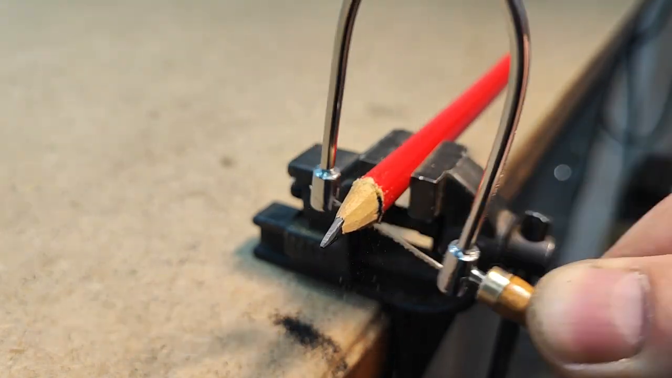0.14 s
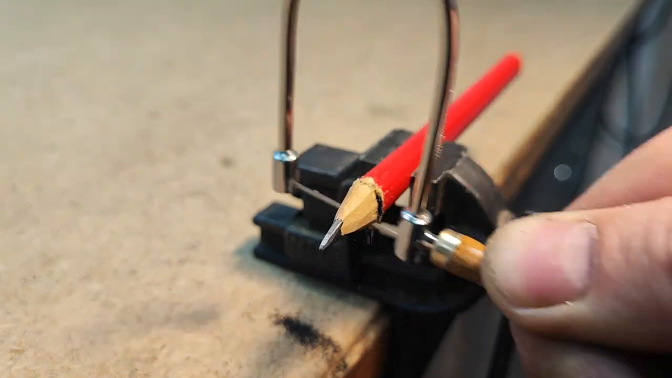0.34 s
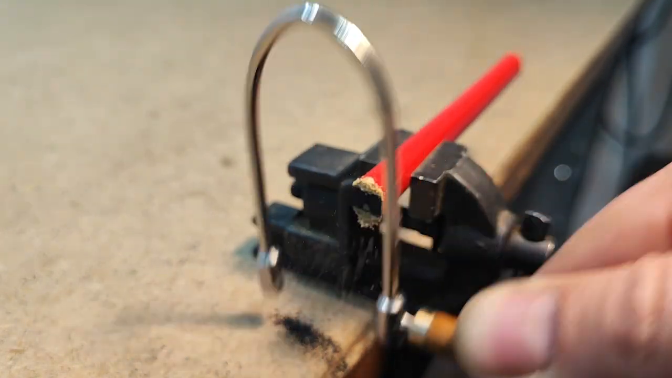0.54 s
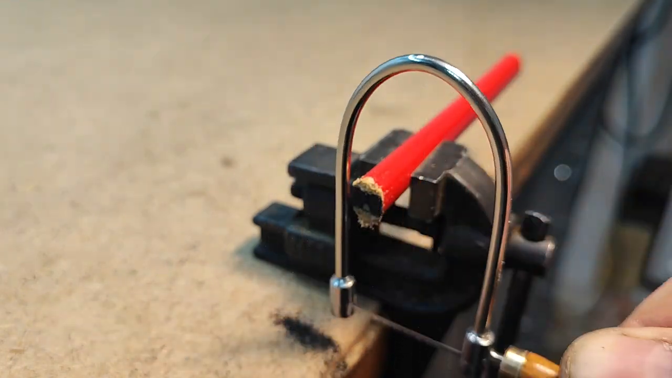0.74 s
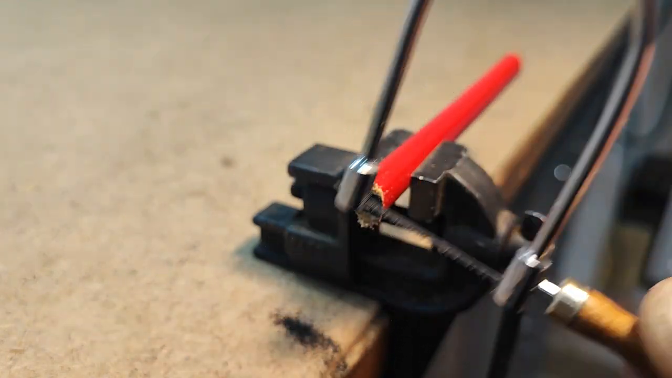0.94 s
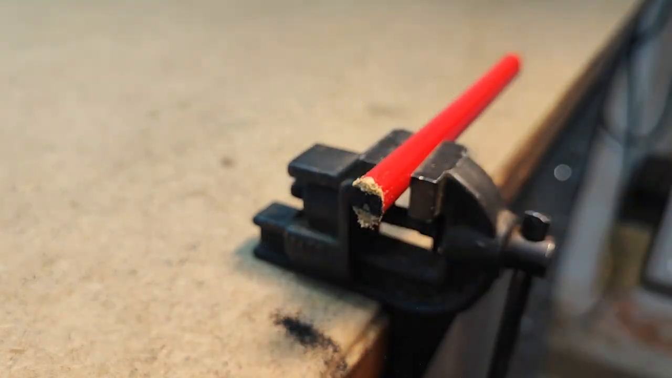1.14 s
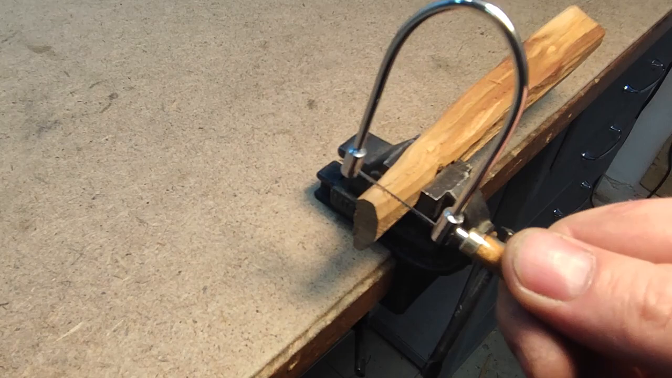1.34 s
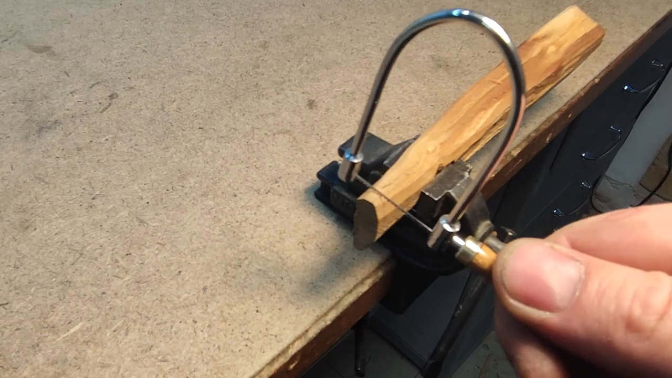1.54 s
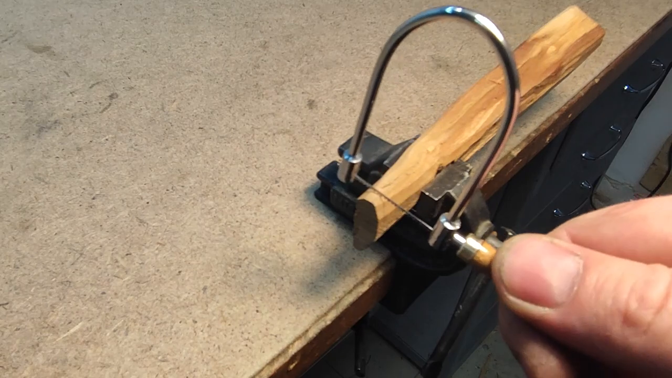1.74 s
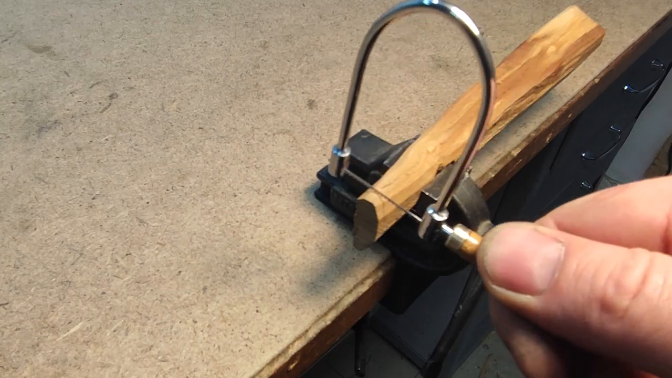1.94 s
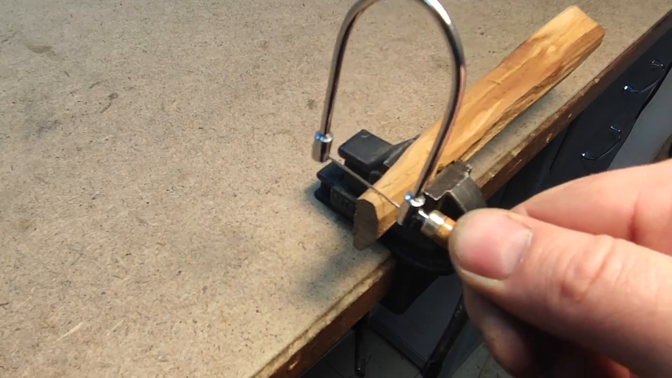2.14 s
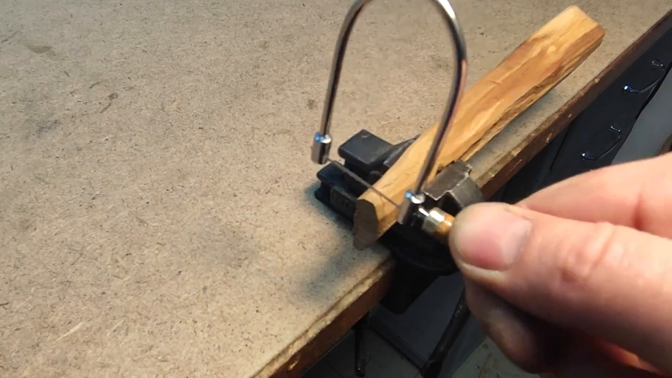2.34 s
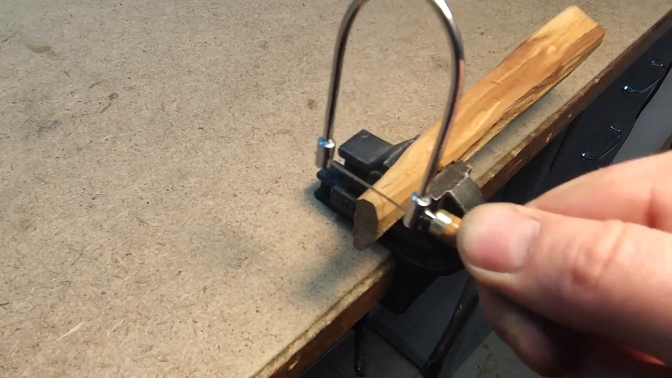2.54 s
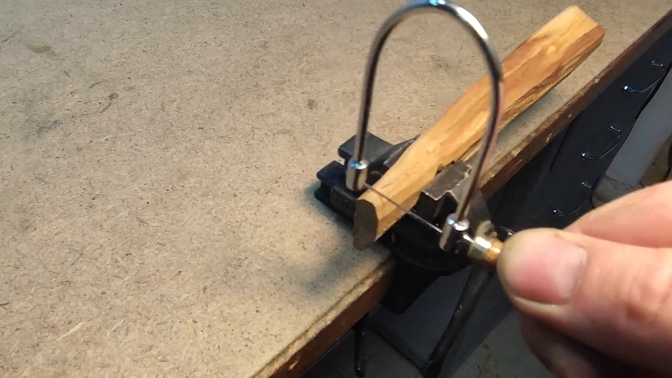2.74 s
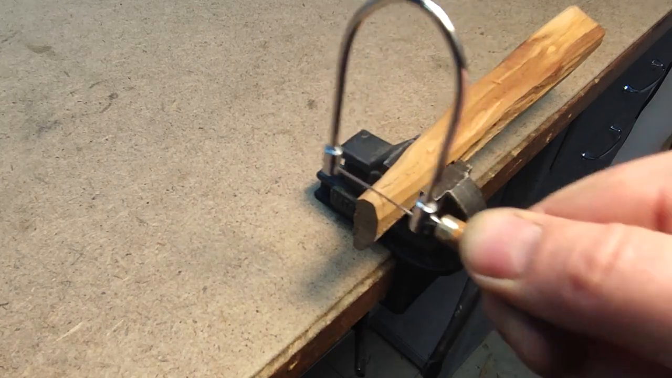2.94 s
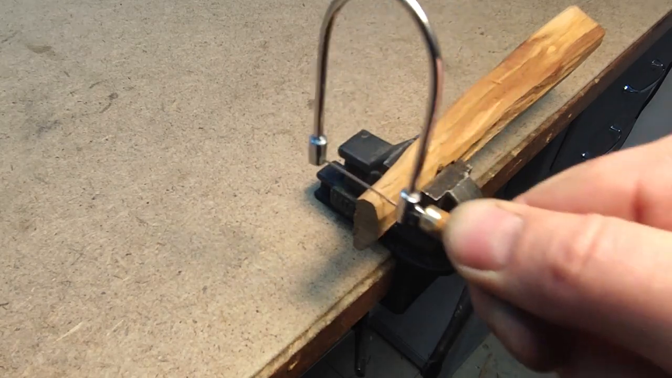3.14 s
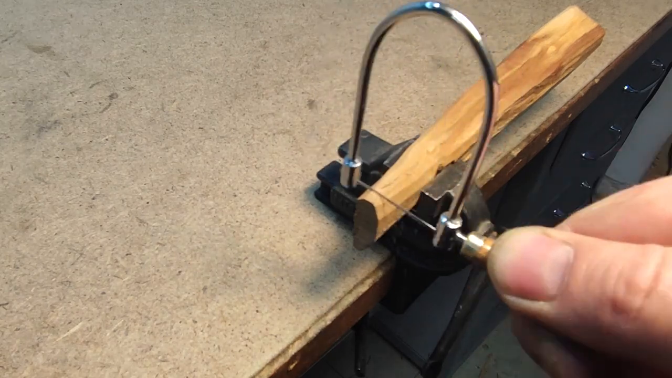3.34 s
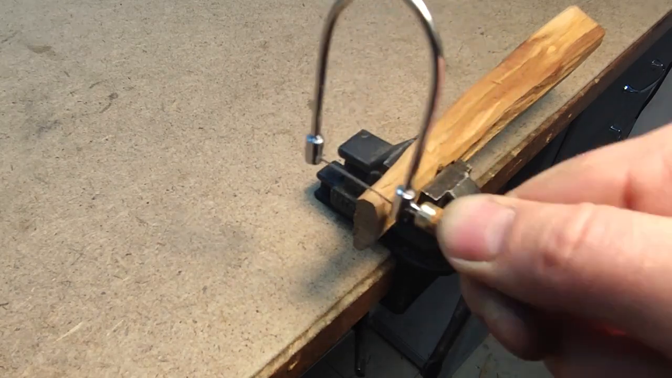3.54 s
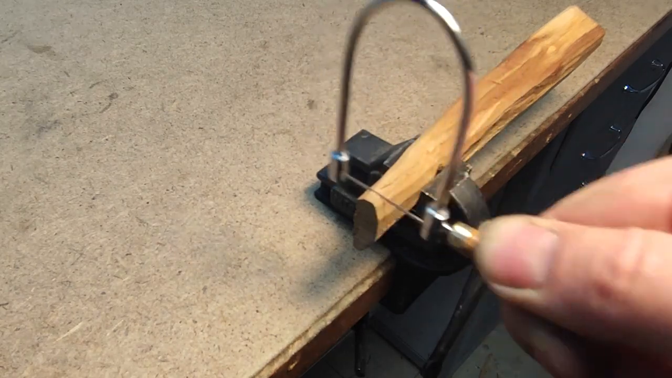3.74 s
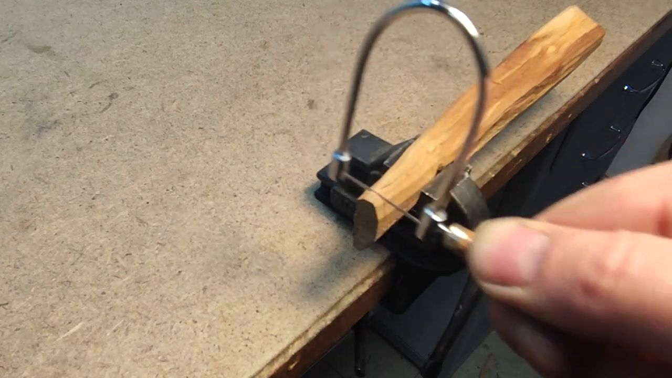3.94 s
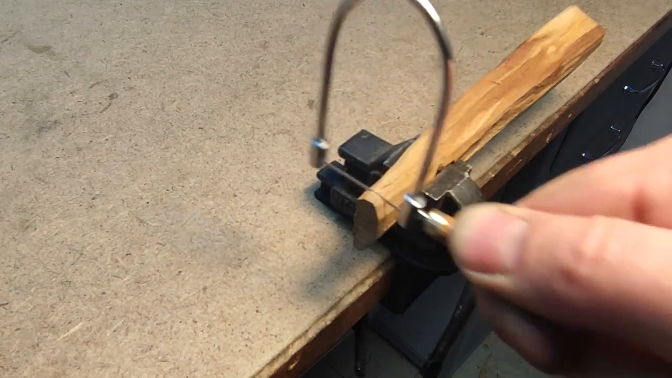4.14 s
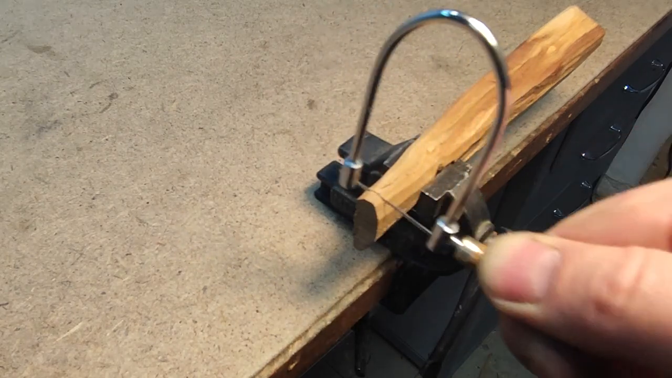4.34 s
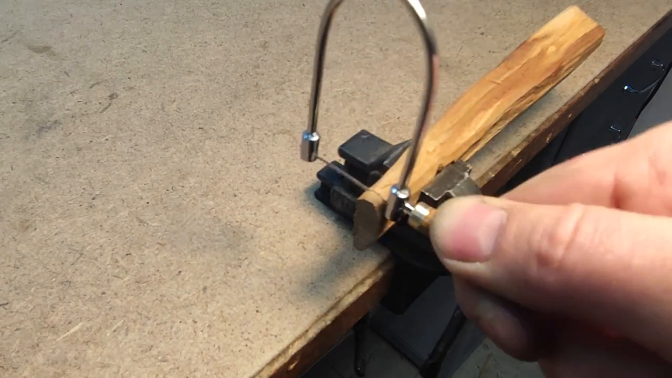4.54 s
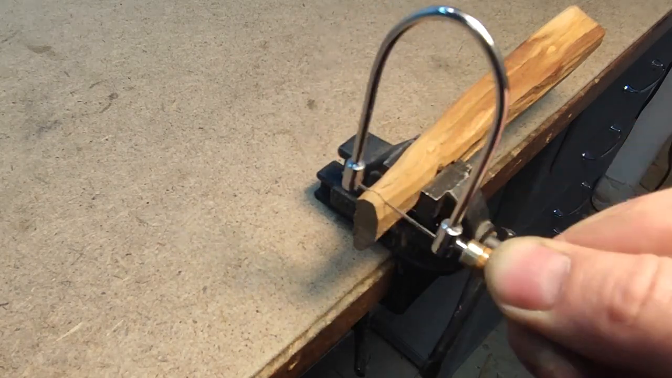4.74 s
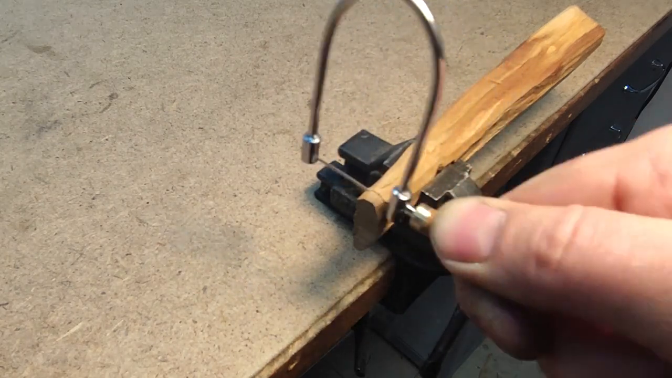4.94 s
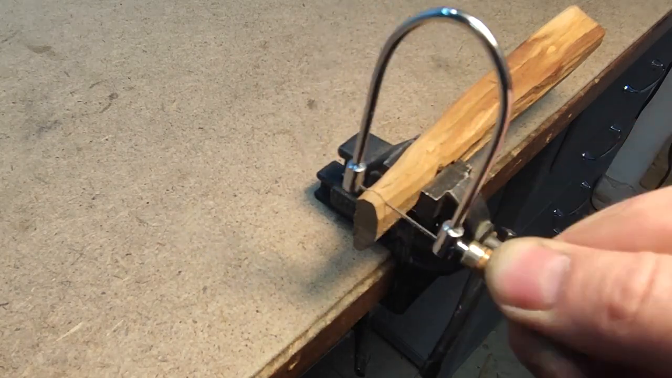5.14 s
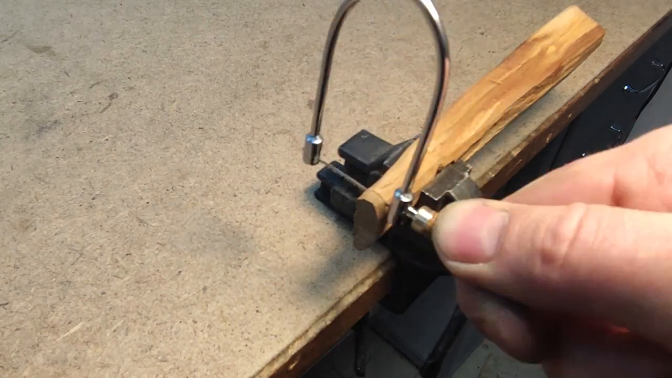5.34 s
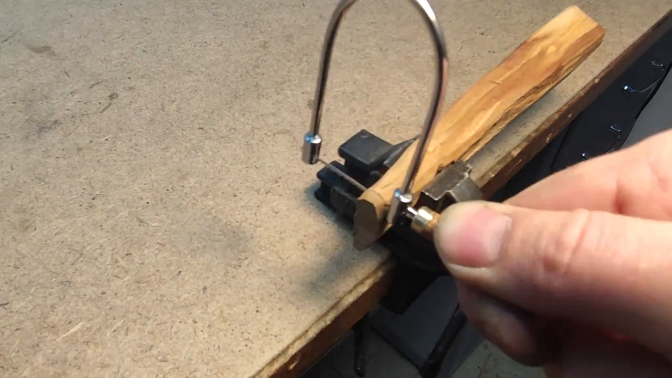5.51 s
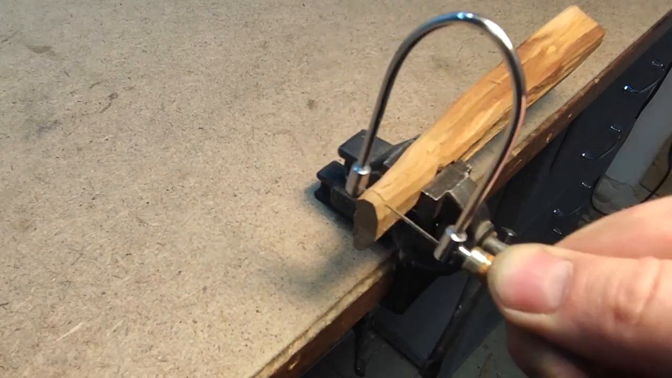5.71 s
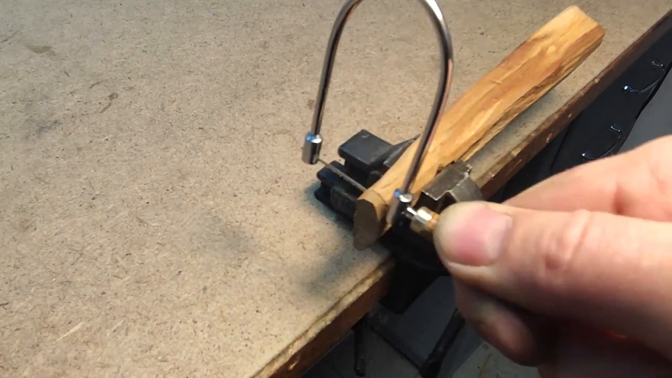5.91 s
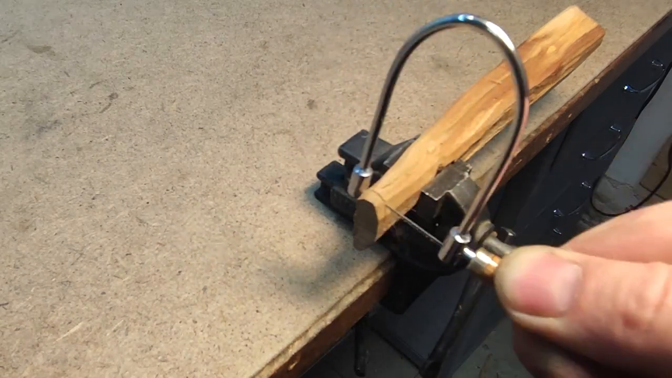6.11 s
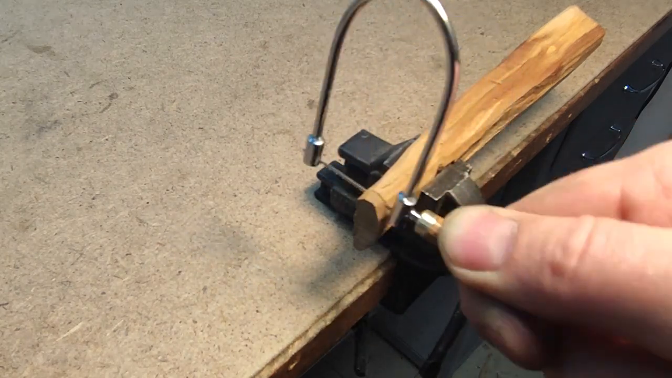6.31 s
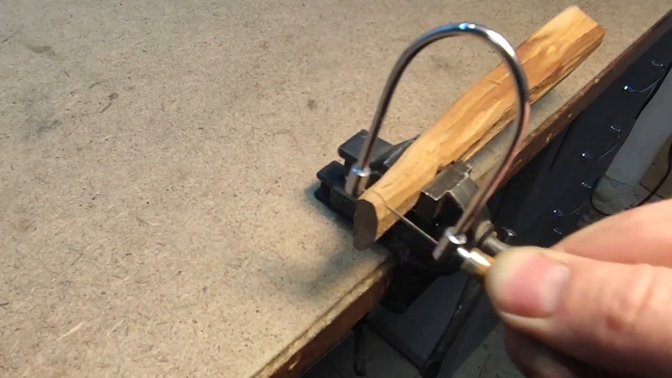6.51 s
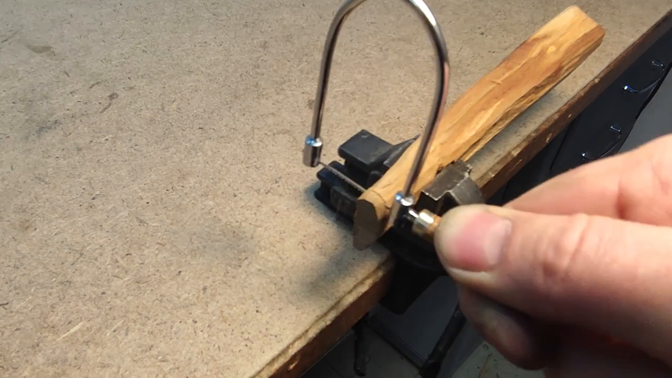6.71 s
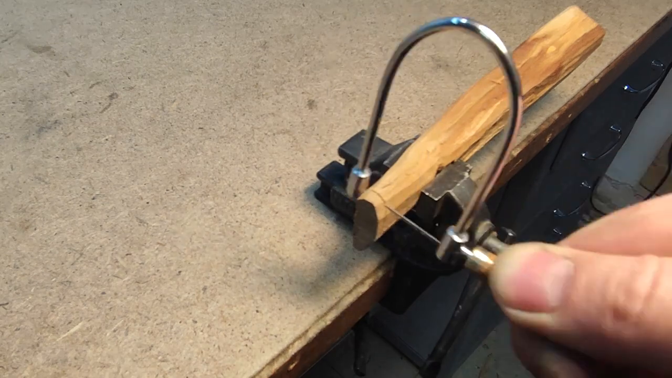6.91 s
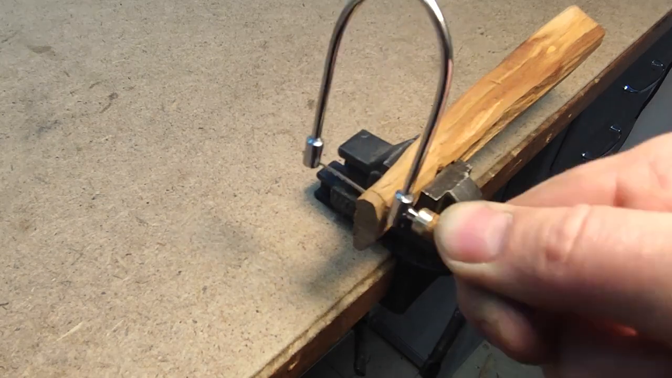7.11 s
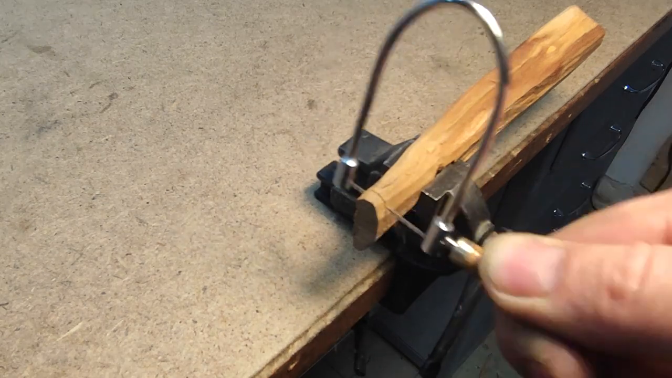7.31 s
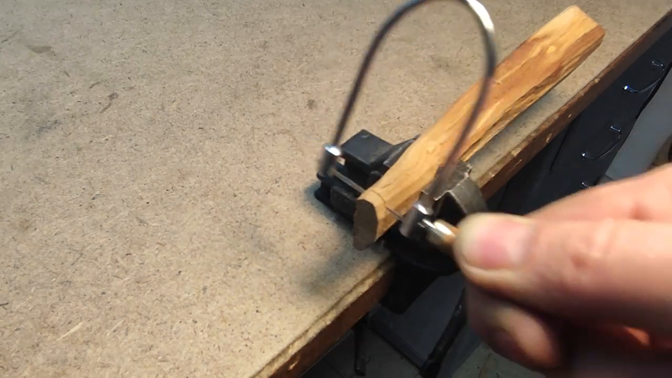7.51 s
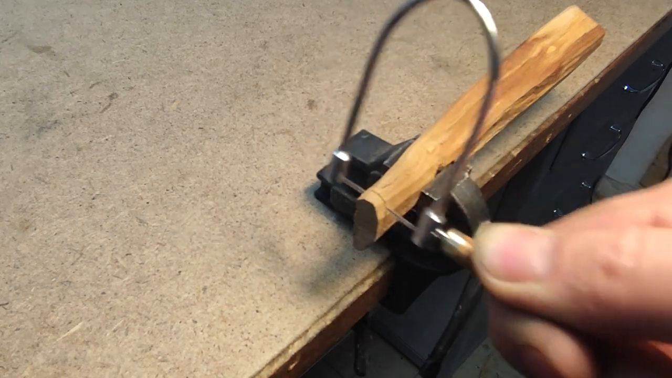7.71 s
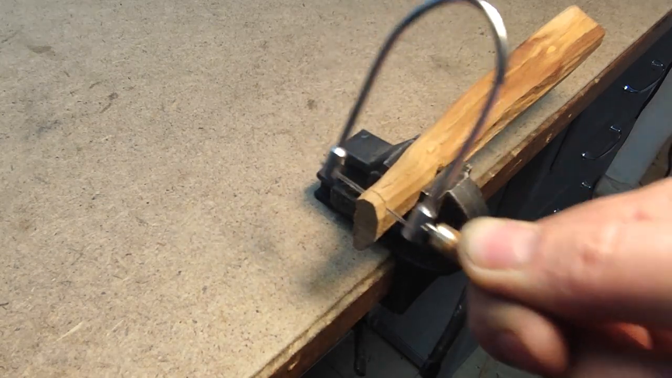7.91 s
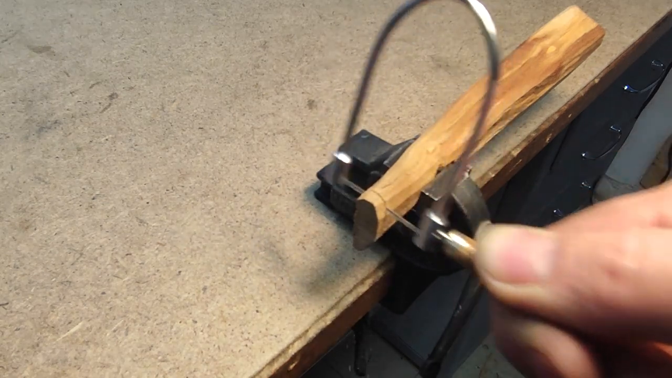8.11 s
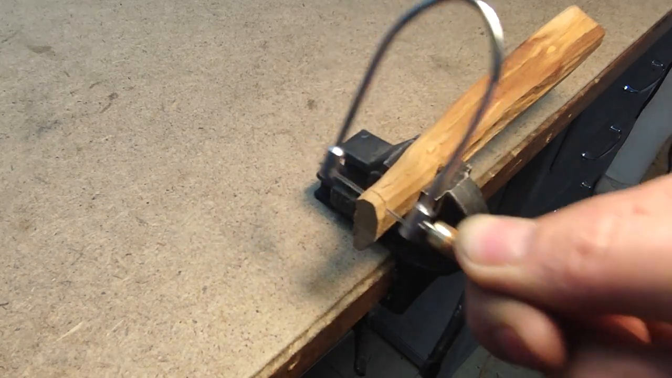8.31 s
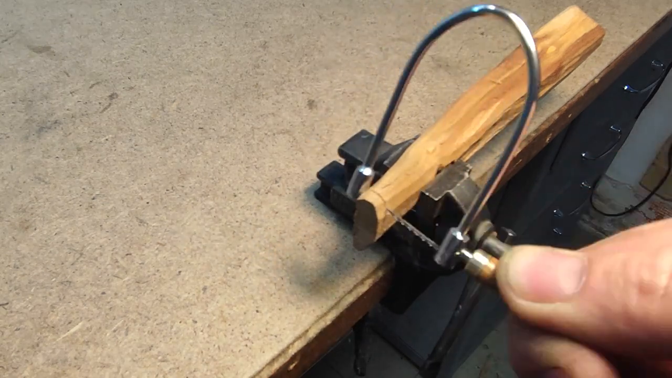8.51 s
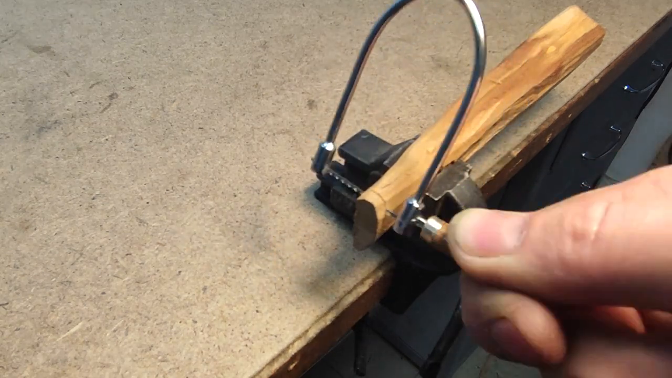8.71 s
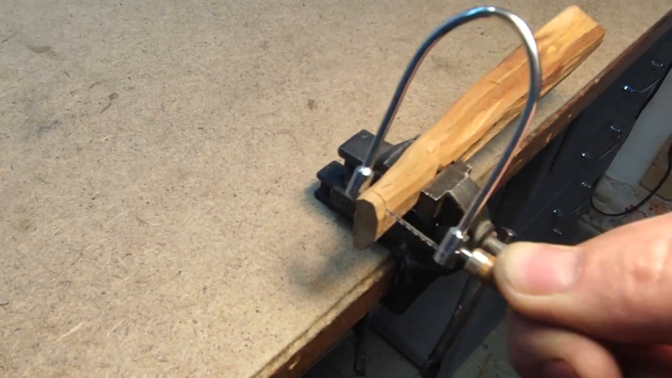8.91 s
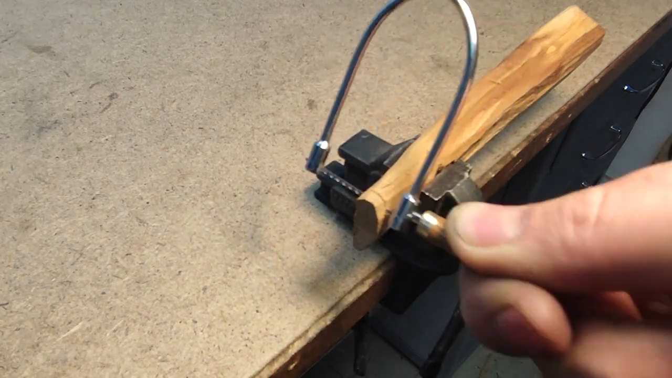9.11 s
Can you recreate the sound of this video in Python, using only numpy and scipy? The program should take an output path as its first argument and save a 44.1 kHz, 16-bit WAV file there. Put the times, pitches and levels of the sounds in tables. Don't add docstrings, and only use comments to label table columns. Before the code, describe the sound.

A tiny hand saw rasps quickly through a pencil until the tip snaps off, then saws a dry stick in fast, buzzing back-and-forth strokes.

```python
import sys
import numpy as np
from scipy import signal
from scipy.fft import rfft, irfft, next_fast_len
from scipy.io import wavfile
from scipy.ndimage import uniform_filter1d, map_coordinates

SR = 44100
rng = np.random.default_rng(int(sys.argv[2]) if len(sys.argv) > 2 else 0)


def gain_from_db(level_db):
    decades = np.asarray(level_db, float) / 20
    return 10 ** decades


def transcribe(signal):
    frames = np.atleast_2d(signal).T
    limited = np.clip(frames, -1, 1)
    pcm = np.round(limited * 32767).astype(np.int16)
    wavfile.write(sys.argv[1], SR, pcm)


N = 403956

# (time [s], push level [dB], pull under push [dB],
# bench over rasp in a push [dB], vise over rasp [dB])
ARM = [(2.26, -54, -3.5, 18, 12), (2.45, -49.5, -3.5, 5, 13), (2.77, -47.5, -4.5, 11.5, 11.5),
       (2.92, -50, -1.5, 11.5, 11), (3.2, -46, -3, 4, 10.5), (3.38, -44, -2, 11.5, 8),
       (3.93, -42.5, -3.5, 5, 11), (4.25, -40.5, -1, 12, 13), (4.6, -41, -2.5, 7.5, 11.5),
       (4.9, -41.5, -4, 9, 10), (5.45, -41.5, -2.5, 9, 12.5), (5.72, -41.5, -3.5, 15, 11),
       (5.95, -41, -4, 5.5, 11.5), (6.13, -40.5, -3.5, 10.5, 11.5), (7.2, -41.5, -5, 10.5, 9.5),
       (7.38, -42.5, -1, 0.5, 9.5), (8.25, -42, -3, 6.5, 10.5), (8.9, -42, -4.5, 13, 13.5)]


def unit(x):
    return x / np.sqrt(np.mean(x ** 2) + 1e-20)


def along(points, hz):
    f, v = np.transpose(points)
    return np.interp(np.log(hz + 1), np.log(f + 1), v)


def curve(rows):
    return np.interp(np.arange(N) / SR, *np.transpose(rows))


def wobble(rate):
    knots = rng.standard_normal(int(N * rate / SR) + 4)
    return map_coordinates(knots, [np.arange(N) * rate / SR])


def filtered(x, response):
    m = next_fast_len(N + SR // 2)
    return irfft(rfft(x, m) * response(np.fft.rfftfreq(m, 1 / SR)), m)[..., :N]


def air():
    # (frequency [Hz], level per Hz [dB])
    spectrum = [(15, -27), (25, 2.5), (205, -8), (500, -15), (2520, -25), (4450, -26), (7830, -31.5),
                (15800, -31.5)]
    # (time [s], level [dB])
    hush_db = [(0, -63), (1.19, -70.5), (1.23, -67.5), (1.65, -69), (1.7, -70), (2.1, -64.5), (9.16, -64.5)]
    hush = filtered(rng.standard_normal((2, N)), lambda hz: gain_from_db(along(spectrum, hz)))
    return unit(hush) * gain_from_db(curve(hush_db) + 3 + 0.7 * wobble(12) + 0.8 * wobble(5))


def resonate(force, modes):
    def response(f):
        both = 0
        for k, (centre, width, left_db, right_db) in enumerate(modes):
            mode = 1j * f * width / (centre * centre - f * f + 1j * f * width)
            both = both + (-1) ** k * gain_from_db([[left_db], [right_db]]) * mode
        return both / np.sqrt(np.mean(np.abs(both) ** 2))
    return filtered(force, response)


def effort(strokes, levels_db, rise, fall, edge):
    t = np.arange(-SR // 10, SR // 5) / SR
    total = np.zeros(N + SR)
    for (start, length_ms, *_), db in zip(strokes, levels_db):
        middle = length_ms / 2000
        bite = np.abs((middle - t) / (middle + rise)) ** edge
        release = ((t - middle) / (middle + fall)) ** 2
        hump = np.exp(-np.where(t < middle, bite, release))
        total[round(start * SR) + SR // 10:][:len(t)] += gain_from_db(db) * hump
    return total[SR // 5:][:N]


def catches(rate, scatter, size_db):
    count = np.cumsum(rate * gain_from_db(scatter * wobble(60))) / SR
    hit = np.diff(np.floor(count), prepend=0) > 0
    return unit(hit * gain_from_db(size_db * rng.standard_normal(N)))


def even(x, seconds):
    power = uniform_filter1d(np.mean(x ** 2, axis=0), int(seconds * SR))
    return x / np.sqrt(np.abs(power) + 1e-20)


def vise_ring(strokes, force, vise_db):
    # (frequency [Hz], width [Hz], left level [dB], right level [dB])
    vise_modes = [(339.3, 22.8, -7.5, -1), (415.5, 18.4, -1.5, 0.5), (513.4, 22.5, -4, 2.5),
                  (572, 27.2, -3, 1), (629.7, 38.4, -9.5, -5), (714.3, 40.6, -7, -15.5),
                  (898, 93, -12.5, -16), (999, 91, -13, -7), (1113, 204, -15, -21), (1330, 310, -22.5, -20),
                  (1593, 200, -25.5, -45)]
    ring = even(resonate(force, vise_modes), 0.03)
    return ring * effort(strokes, vise_db + 1.5, rise=0.0031, fall=0.0098, edge=3.1)


def chatter(strokes):
    start, *_, hz = np.transpose(strokes)
    current = np.searchsorted(start - 0.012, np.arange(N) / SR) - 1
    pitch = hz[np.clip(current, 0, None)] * (1 + 0.03954 * wobble(50))
    turn = 2 * np.pi * np.cumsum(pitch) / SR
    octave = 0.31 * np.exp(-((2 * pitch - 420) / 50) ** 2)
    hum = np.sin(turn) + octave * np.sin(2 * turn + wobble(30))
    return unit(hum * gain_from_db(3 * wobble(45)))


def bench_shake(strokes, force, bench_db):
    # (frequency [Hz], width [Hz], left level [dB], right level [dB])
    bench_modes = [(145.4, 55, 1.2, 3), (223, 140, 2.9, -5)]
    shove = effort(strokes, bench_db - 2.5, rise=-0.0073, fall=0.0034, edge=3.8)
    hum = shove * chatter(strokes) * gain_from_db([[0.6], [-0.6]])
    shaken = resonate(resonate(0.49 * shove * force, bench_modes), bench_modes)
    return hum + shaken * gain_from_db(-17.5)


def patchy(x, depth_db):
    z = signal.stft(x, nperseg=768)[2]
    streaks = uniform_filter1d(rng.standard_normal(z.shape), size=2, axis=1)
    streaks = uniform_filter1d(streaks, size=3, axis=2)
    return unit(signal.istft(z * gain_from_db(depth_db * unit(streaks)), nperseg=768)[1][:, :N])


def fibre_tearing(strokes, teeth, rasp_db, frame):
    decay = gain_from_db(-60 * np.arange(400) / SR / 0.003)
    bite = np.convolve(teeth, decay)[:N]
    fibres = patchy(rng.standard_normal((2, N)), depth_db=4)
    fibres = fibres * (1.6 + 0.29 * unit(bite)) * gain_from_db(1.4 * wobble(90))
    pressure = effort(strokes, rasp_db + 0.18, rise=0.0052, fall=0.0027, edge=2.95)
    return resonate(unit(fibres) * pressure, frame)


def free_end(strokes, teeth, force, rasp_db, bench_db):
    # (frequency [Hz], width [Hz], left level [dB], right level [dB])
    end_modes = [(965, 116, 2, -1), (1182, 198, -3.5, -6.5), (1504, 210, -11, -12)]
    free_db = rasp_db - 1 - 0.49 * (bench_db - rasp_db - 7.5)
    pressure = effort(strokes, free_db, rise=0.0012, fall=0.0043, edge=2)
    return resonate(unit(teeth - teeth.mean() + 0.35 * force) * pressure, end_modes)


def sawing(strokes, frame, grip_db):
    _, _, rasp_db, bench_db, _ = np.transpose(strokes)
    vise_db = rasp_db + grip_db + rng.standard_normal(len(strokes))
    teeth = catches(rate=330, scatter=3, size_db=4.0)
    force = unit(teeth - teeth.mean() + 0.78 * rng.standard_normal((2, N)))
    vise = vise_ring(strokes, force, vise_db)
    bench = bench_shake(strokes, force, bench_db)
    rasp = fibre_tearing(strokes, teeth, rasp_db, frame)
    return vise + bench + rasp + free_end(strokes, teeth, force, rasp_db, bench_db)


def sway(strokes):
    # (time [s], level [dB])
    sway_db = [(0.02, -46), (0.15, -65), (0.22, -37.5), (0.34, -64.5), (0.58, -52), (.72, -87), (1.9, -96),
               (2.28, -52.5), (2.8, -60), (3.5, -54.5), (4.05, -57), (4.28, -48.5), (5.0, -56.5),
               (6.18, -50.5), (6.72, -57), (7.68, -52), (8.5, -49), (9.1, -55.5)]
    top_hz = 96.9
    _, _, rasp_db, bench_db, _ = np.transpose(strokes)
    shoves = effort(strokes, 0.48 * (bench_db - rasp_db - 9), rise=0.004, fall=0.019, edge=2.2)
    level = gain_from_db(curve(sway_db) - 3 + 3.2 * wobble(7)) * (0.45 + shoves)
    turn = 2 * np.pi * np.cumsum(top_hz * (1 + 0.12 * wobble(25))) / SR
    hum = unit(np.sin(turn) * gain_from_db(3.5 * wobble(14)))
    rumble = unit(filtered(rng.standard_normal((2, N)),
                           lambda hz: np.exp(-(np.log((hz + 1) / 92) / 0.39) ** 2)))
    return level * (hum + 0.91 * rumble) * gain_from_db([[0.5], [-2.8]])


def noise_band(low_hz, high_hz, count):
    sos = signal.butter(N=2, Wn=[low_hz, min(high_hz, 20000)], btype="band", fs=SR, output="sos")
    return unit(signal.sosfilt(sos, rng.standard_normal((2, count))))


def cracks(contacts, t60):
    t = np.arange(-SR // 50, SR // 3) / SR
    out = np.zeros((2, N + SR))
    for s, db, pan_db, low_hz, high_hz in contacts:
        burst = noise_band(low_hz, high_hz, len(t)) * np.exp(-(t / 0.0029) ** 2)
        tail = noise_band(low_hz, 0.7 * high_hz + 0.3 * low_hz, len(t))
        tail = tail * gain_from_db(-7 - 60 * np.abs(t) / t60) * (t > 0)
        gain = gain_from_db([[db - 11 + pan_db / 2], [db - 4.5 - pan_db / 2]])
        out[:, round(s * SR) - SR // 50:][:, :len(t)] += gain * (burst + tail)
    return out[:, :N]


def tip_snaps():
    # (time [s], peak level [dB], left over right plus 6.5 [dB], low edge [Hz], high edge [Hz])
    fractures = [
        (0.559, -40, -4, 800, 11830),
        (.568, -21, 10, 900, 7200),
        (.569, -28, 8, 4600, 5630),
        (0.595, -29.5, 16, 2500, 8900),
        (0.599, -23.5, 13, 1630, 2200),
        (.606, -26, 1.5, 350, 1400),
        (0.642, -30.5, 10, 1490, 6000),
        (0.6919, -27.5, 10, 1400, 12000),
    ]
    return cracks(fractures, t60=0.11)


def thuds():
    # (time [s], level [dB], t60 [s], centre [Hz], band edge over centre [ratio])
    knocks = [
        (0.606, -30, 0.087, 227, 1.12),
        (.862, -55, 0.15, 240, 1.4),
        (1.407, -57, 0.2, 285, 1.25),
        (1.948, -50, 0.21, 213, 1.3),
        (1.989, -57, 0.5, 430, 1.17),
        (2.134, -55, 0.5, 330, 1.4),
        (1.95, -53, 0.25, 645, 1.4),
    ]
    t = np.arange(-SR // 50, SR // 3) / SR
    out = np.zeros((2, N + SR))
    for s, db, t60, hz, wide in knocks:
        knock = noise_band(hz / wide, hz * wide, len(t))[0]
        knock = gain_from_db(db - 60 * t / t60) * np.clip(t / 0.008, 0, 1) * knock
        out[:, round(s * SR) - SR // 50:][:, :len(t)] += knock
    return out[:, :N]


def ticks():
    # (time [s], peak level [dB], left over right plus 6.5 [dB], low edge [Hz], high edge [Hz])
    touches = [
        (0.6738, -32, 18.5, 1220, 3000),
        (0.7192, -40, 11, 1500, 2460),
        (.771, -54, 16, 1400, 2340),
        (4.304, -29, 13, 592, 4470),
    ]
    return cracks(touches, t60=0.053)


def scrapes():
    # (time [s], peak level [dB], left over right plus 6.5 [dB], low edge [Hz], high edge [Hz])
    slides = [
        (0.863, -53.5, 4, 1000, 8950),
        (1.954, -47, 14, 300, 12000),
        (1.964, -44.5, 7, 900, 7000),
        (2.03, -59, 5, 2000, 11000),
        (2.127, -57, 5, 2500, 5000),
    ]
    return cracks(slides, t60=0.24)


def stick_strokes():
    # (time [s], pushes made [count], share of the cycle taken by the push [ratio])
    pace = [(2.261, 0, .51), (2.449, 1, .47), (2.616, 2, .47), (3.083, 5, .49), (3.225, 6, .5),
            (3.521, 8, .47), (3.935, 11, .47), (4.201, 13, .49), (4.765, 17, .47), (5.036, 19, .47),
            (5.723, 24, .465), (6.267, 28, .47), (7.208, 35, .45), (7.342, 36, .5), (7.621, 38, .5),
            (8.292, 43, .5), (8.939, 48, .48), (9.205, 50, .45)]
    # (start [s], length [ms], rasp [dB], bench [dB], bench hum [Hz])
    first_touch = (2.149, 67, -66.5, -46.5, 159.5)
    # (time [s], bench level [dB], hum [Hz])
    locked = [(2.36, -39.5, 218), (2.69, -38.5, 223), (3.15, -35, 165), (3.44, -35, 227),
              (3.86, -34.5, 164), (3.94, -36.5, 164), (4.0, -34, 160.7), (4.07, -29.5, 219.7),
              (4.13, -35, 162), (4.41, -35.5, 206.4), (4.69, -34, 228.6), (4.76, -34.5, 220),
              (4.96, -33, 160.7), (5.1, -34.5, 204), (5.24, -33, 215), (5.31, -30, 208.8),
              (5.65, -35, 228.5), (5.72, -28, 223), (5.86, -33.5, 236), (6.06, -36.5, 166),
              (6.33, -39, 172), (6.46, -34, 161), (6.54, -33, 231.3), (6.6, -36, 218.2), (6.94, -28.5, 226),
              (7.27, -35, 163), (7.69, -45, 208), (7.76, -31.5, 220), (8.02, -30, 223), (9.0, -40.5, 223)]
    fill = 0.56
    s, made, share = np.transpose(pace)
    k = np.arange(made[-1])
    push, following = np.interp(k, made, s), np.interp(k + 1, made, s)
    pull = push + np.interp(k, made, share) * (following - push)
    at, push_db, under_db, lock_db, _ = np.transpose(ARM)
    chance = rng.standard_normal((len(k), 4))
    hard_db = np.interp(push, at, push_db)
    soft_db = np.interp(pull, at, push_db + under_db)
    push_bench_db = hard_db + np.interp(push, at, lock_db) + chance[:, 0]
    pull_bench_db = soft_db + 4 + 1.8 * chance[:, 2]
    push_hum_hz = 220.3 * (1 + 0.02 * chance[:, 1])
    pull_hum_hz = 204.9 * (1 + 0.1 * chance[:, 3])
    pushes = np.transpose([push, 1e3 * fill * (pull - push), hard_db, push_bench_db, push_hum_hz])
    pulls = np.transpose([pull, 1e3 * fill * (following - pull), soft_db, pull_bench_db, pull_hum_hz])
    rows = np.stack([pushes, pulls], axis=1).reshape(2 * len(k), -1)
    for when, db, hz in locked:
        rows[np.argmin(np.abs(rows[:, 0] - when)), -2:] = db, hz
    return [first_touch, *rows]


def room(x):
    # (frequency [Hz], t60 [s])
    decay_times = [(200, .22), (2000, .12), (10000, .08)]
    out, size = np.zeros((2, N + SR)), SR // 4
    for start in range(0, N, size // 2):
        hz, t, z = signal.stft(rng.standard_normal((2, size)), SR, nperseg=256)
        decay = gain_from_db(-60 * t / along(decay_times, hz)[:, None])
        tail = signal.istft(z * decay, SR, nperseg=256)[1]
        piece = x[:, start:start + size]
        piece = piece * np.hanning(size)[:piece.shape[1]]
        echo = signal.fftconvolve(piece, tail / np.linalg.norm(tail[0]), axes=1)
        out[:, start:start + echo.shape[1]] += echo
    return out[:, :N]


def scene():
    # (start [s], length [ms], rasp level [dB], bench level [dB], bench hum [Hz])
    pencil = [
        (0.017, 57, -48.5, -27, 156.4),
        (0.104, 42, -48, -40.5, 241.3),
        (0.177, 50, -51.5, -35, 203.2),
        (0.265, 40, -50, -31.5, 228),
        (0.334, 69, -56.5, -39.5, 203),
        (0.438, 49.5, -52.5, -37, 217),
        (.527, 53, -51.5, -44.5, 233),
    ]
    # (frequency [Hz], width [Hz], left level [dB], right level [dB])
    frame_pencil = [(1400, 130, 2, -2), (2200, 480, -1, 0), (2900, 430, 6.5, 2), (4200, 2200, -2.5, -1.5),
                    (6000, 470, 3.5, 8), (7900, 730, 1.5, -1), (9550, 1500, -2, -1),
                    (13400, 2500, -12, -21)]
    frame_stick = [(1550, 514, 0.5, -2.5), (2790, 265, -1, 1.5), (3390, 810, -6.5, -5), (4880, 540, -4, 1),
                   (5816, 466, 3, 3), (6834, 460, -27, 0.5), (9070, 1110, -39, 0.5),
                   (9640, 1870, -7.5, -3.5), (12900, 2700, -18.5, -18.5)]
    blade = [(4945, 90, -9, -4), (5430, 120, -6, -6), (5890, 120, -4, -6), (6820, 150, -9, -8)]
    stick = stick_strokes()
    at, *_, arm_grip_db = np.transpose(ARM)
    is_pull = np.arange(len(stick)) % 2 == 0
    grip_db = np.interp(np.transpose(stick)[0], at, arm_grip_db) - 0.5 * is_pull
    near = sawing(pencil, frame_pencil, 10.6) + sawing(stick, frame_stick + blade, grip_db)
    near = near + sway(pencil + stick) + tip_snaps() + thuds() + ticks() + scrapes()
    return near + gain_from_db(-8.5) * room(near) + air()


def band_limit(x):
    return signal.sosfilt(signal.butter(12, 15830, fs=SR, output="sos"), x)


def record(dry):
    # (from [s], to [s])
    opposed = [(0, .25), (2.51, 2.6), (2.83, 2.91), (2.99, 3.85), (3.92, 3.98), (4.05, 4.26), (4.95, 5.02),
               (5.22, 5.36), (5.44, 5.57), (5.98, 6.04), (6.18, 6.39), (6.52, 6.58), (6.72, 6.85),
               (7.06, 7.87), (7.94, 8), (8.21, 8.34), (8.99, 9.12)]
    deep_flips = [.12, 2.42, 2.82, 3.3, 4.15, 5.6, 5.8, 6.02, 6.2, 7.02, 7.6, 8.02, 8.25, 8.6, 8.8, 8.98]
    hz, t, z = signal.stft(dry[1], SR, nperseg=1024)
    drift = uniform_filter1d(rng.standard_normal(z.shape), size=2, axis=0)
    drift = unit(uniform_filter1d(drift, size=10, axis=1))
    drift[(hz > 120) & (hz < 290)] = (-1.) ** np.searchsorted(np.ravel(opposed), t, side="right")
    drift[hz < 120] = -(-1.) ** np.searchsorted(deep_flips, t)
    drift[hz > 2000] = 1
    phase = np.pi / 2 * (np.tanh(3 * drift) - 1)
    right = signal.istft(z * np.exp(1j * phase), nperseg=1024)[1][:N]
    mix = filtered(np.array([dry[0], right]), lambda hz: hz < 15830)
    return band_limit(mix)


dry = scene()
out = record(dry)
transcribe(out)
```